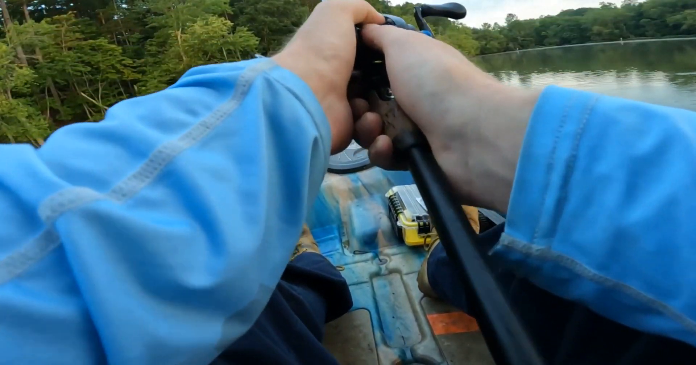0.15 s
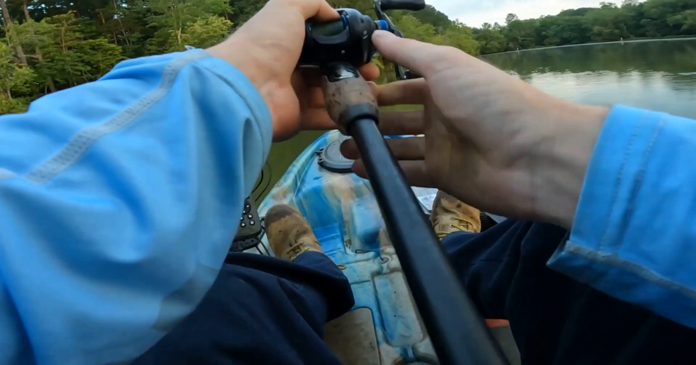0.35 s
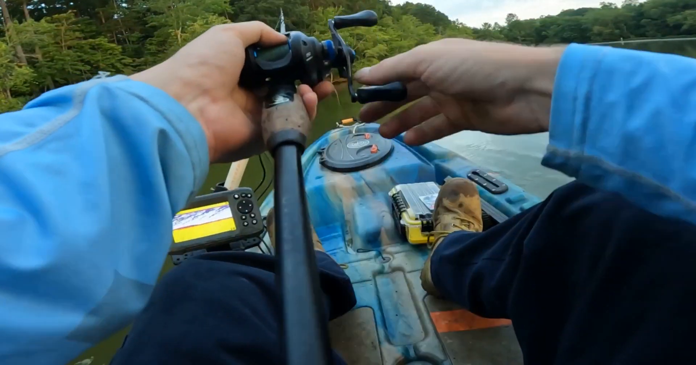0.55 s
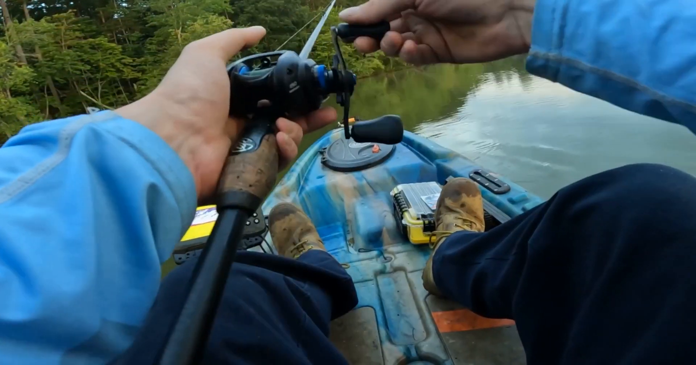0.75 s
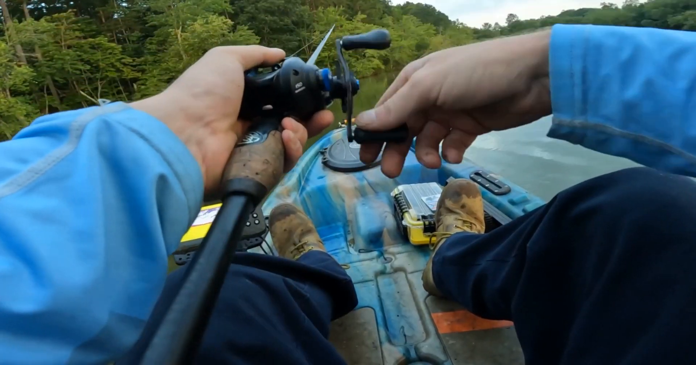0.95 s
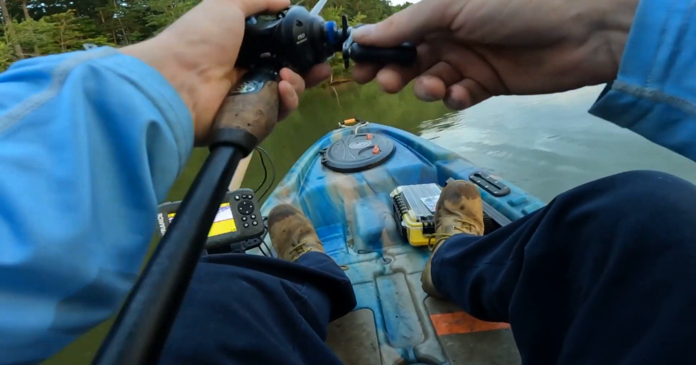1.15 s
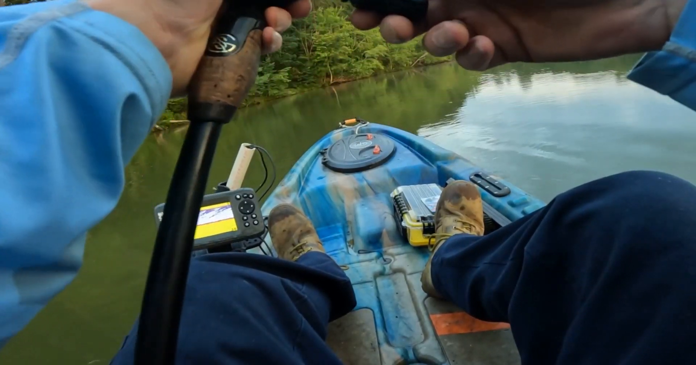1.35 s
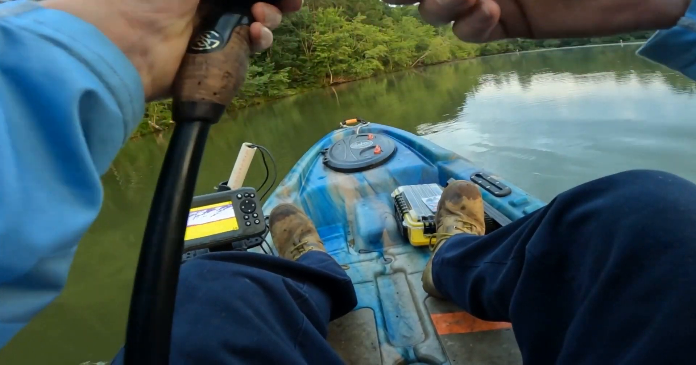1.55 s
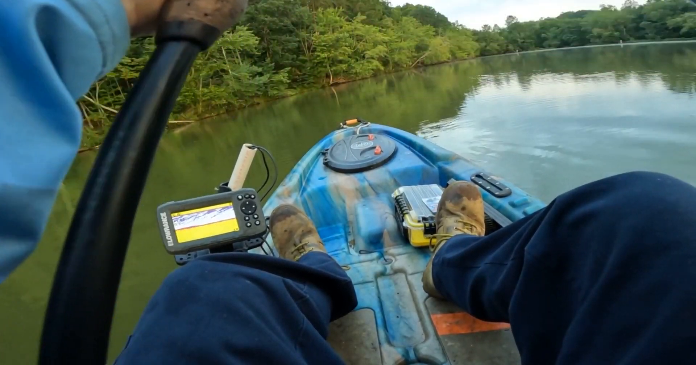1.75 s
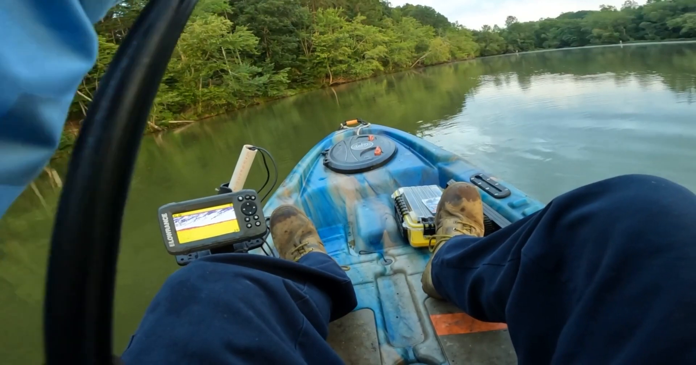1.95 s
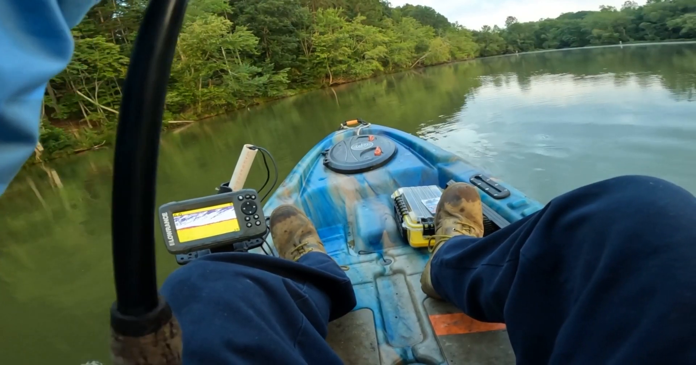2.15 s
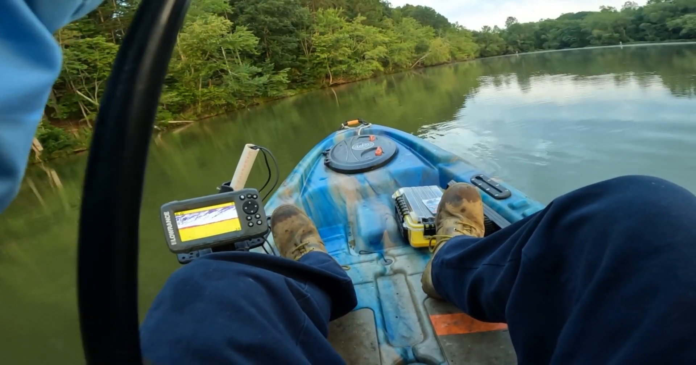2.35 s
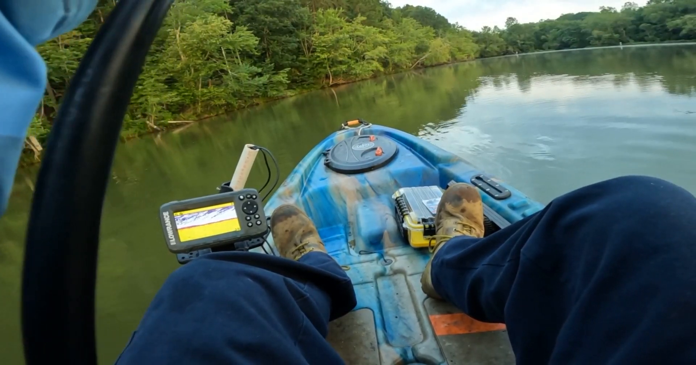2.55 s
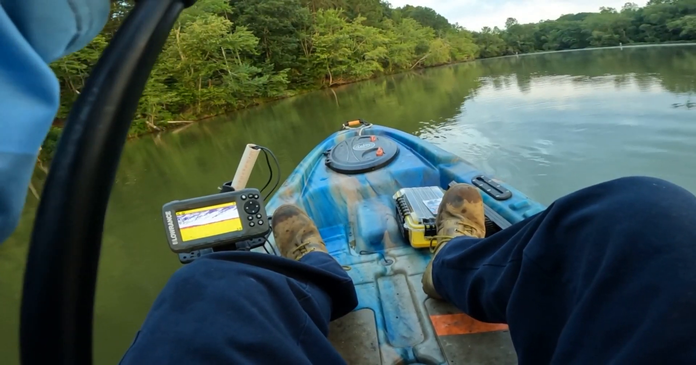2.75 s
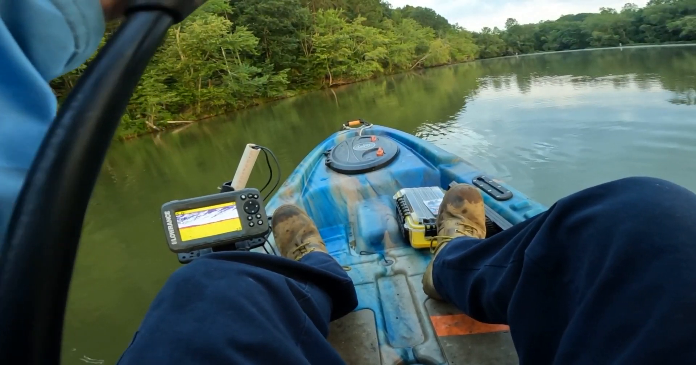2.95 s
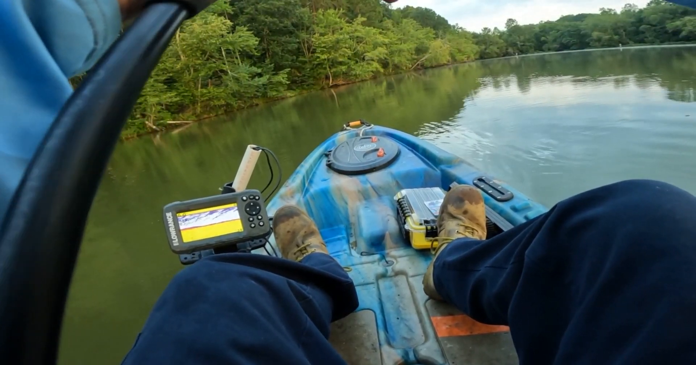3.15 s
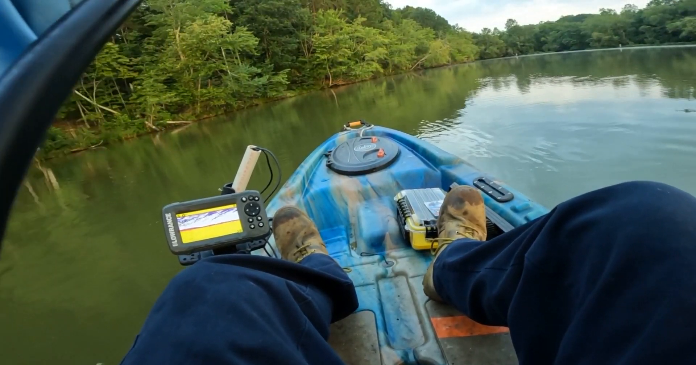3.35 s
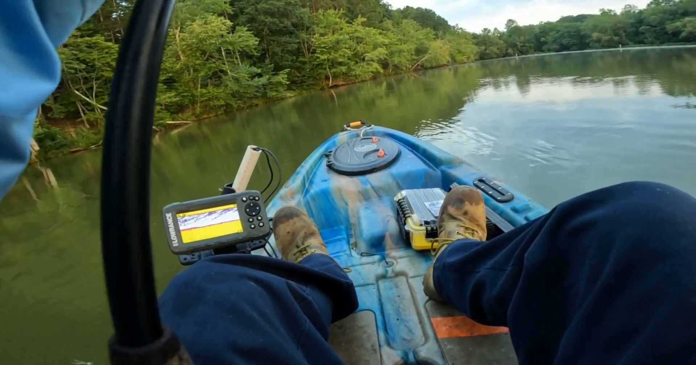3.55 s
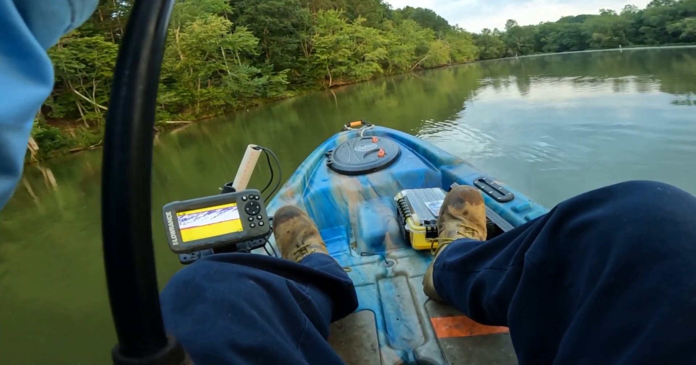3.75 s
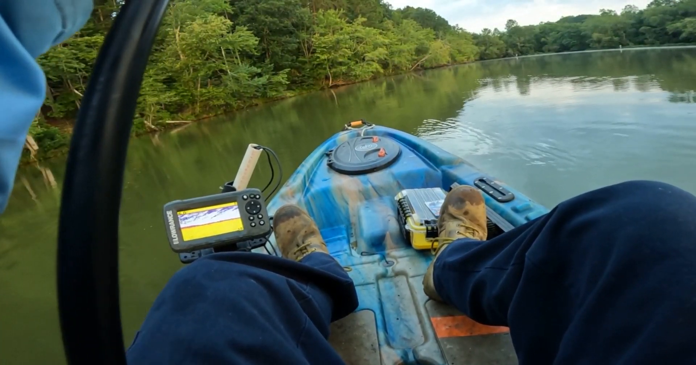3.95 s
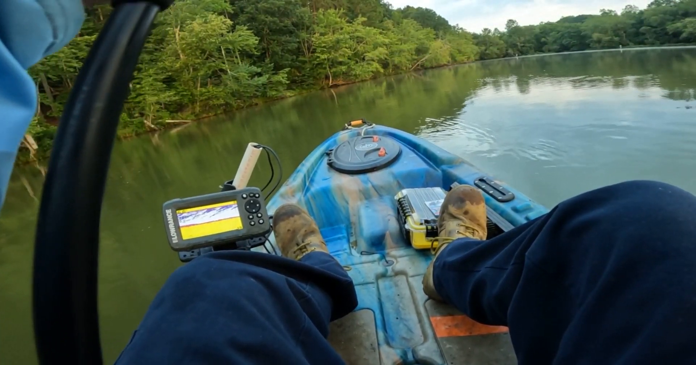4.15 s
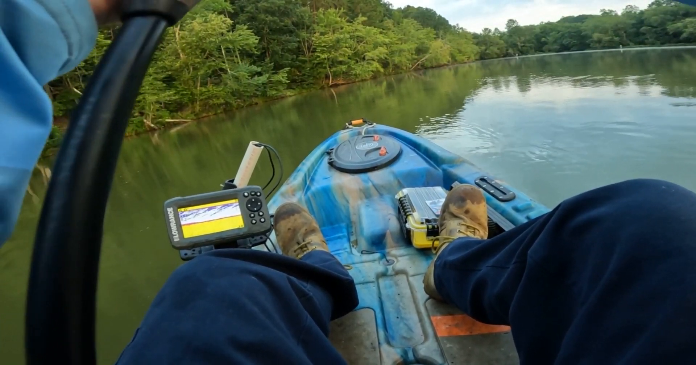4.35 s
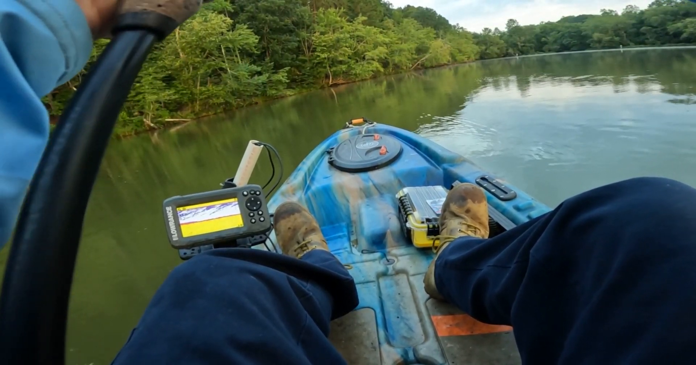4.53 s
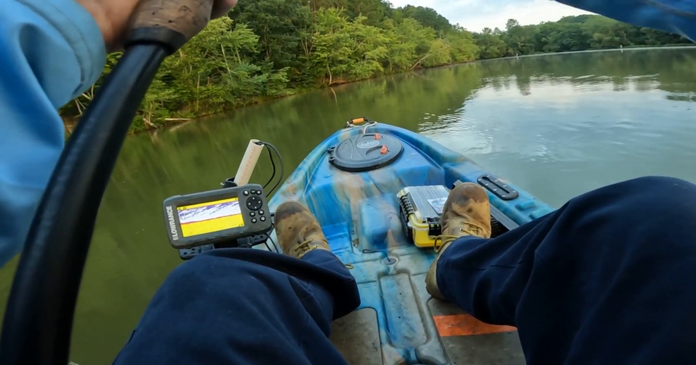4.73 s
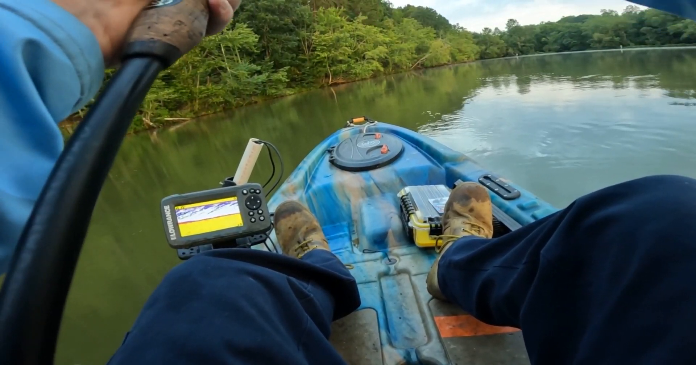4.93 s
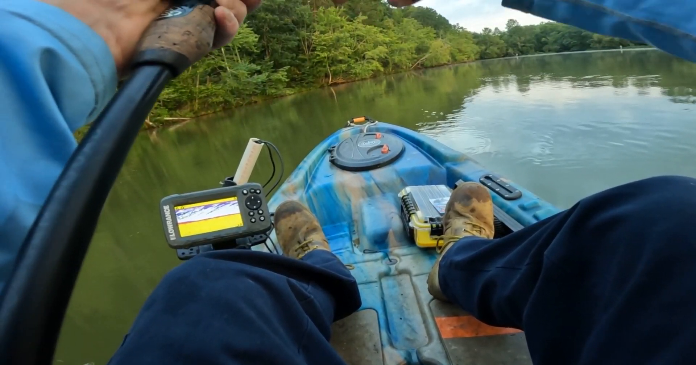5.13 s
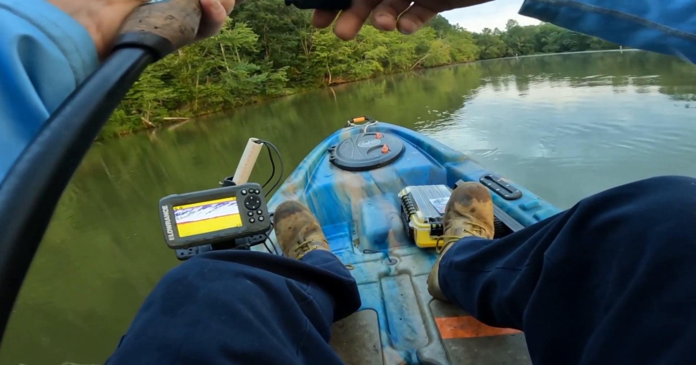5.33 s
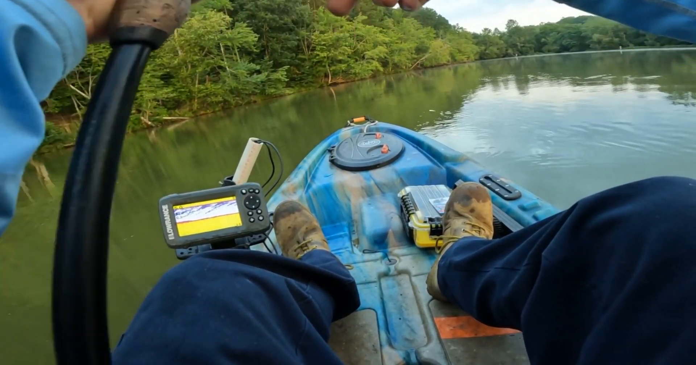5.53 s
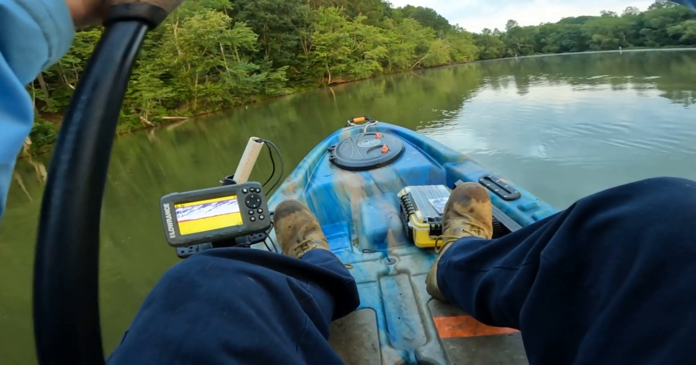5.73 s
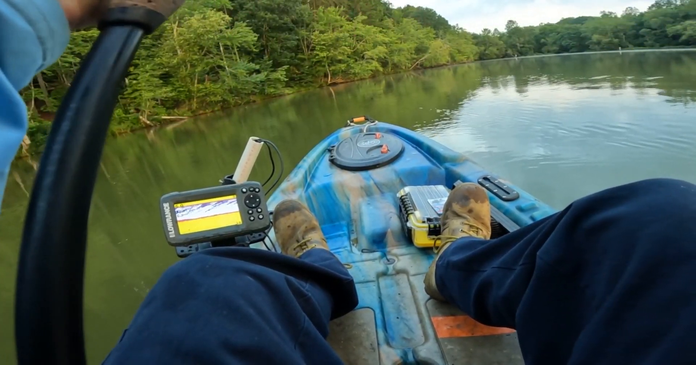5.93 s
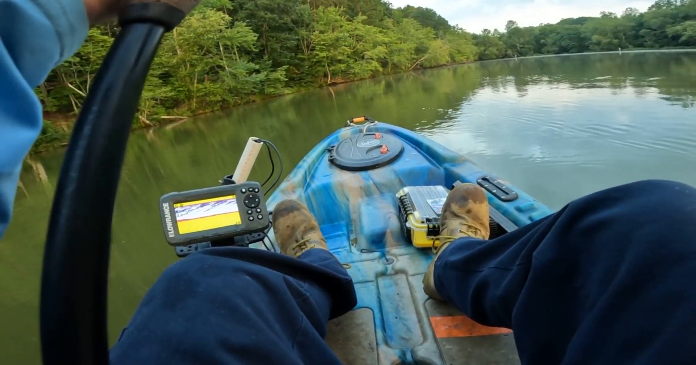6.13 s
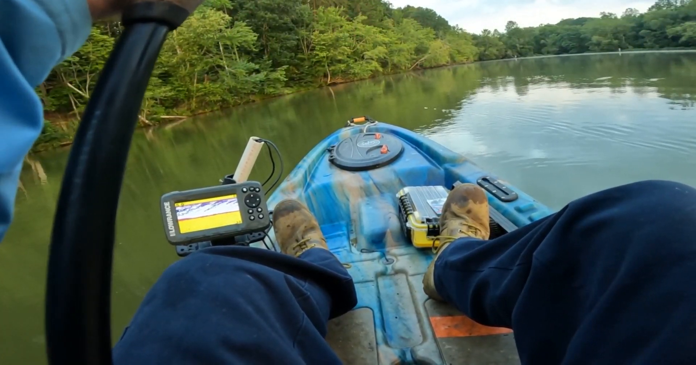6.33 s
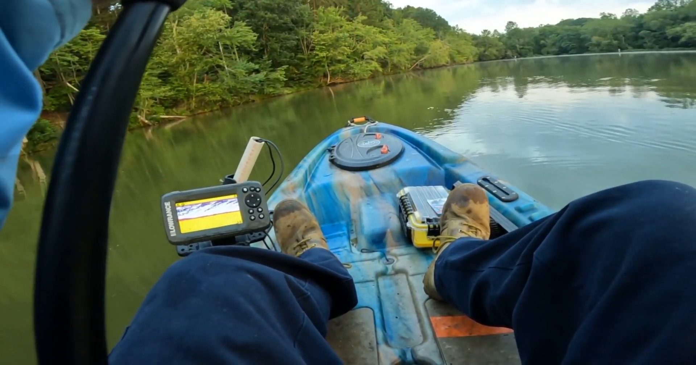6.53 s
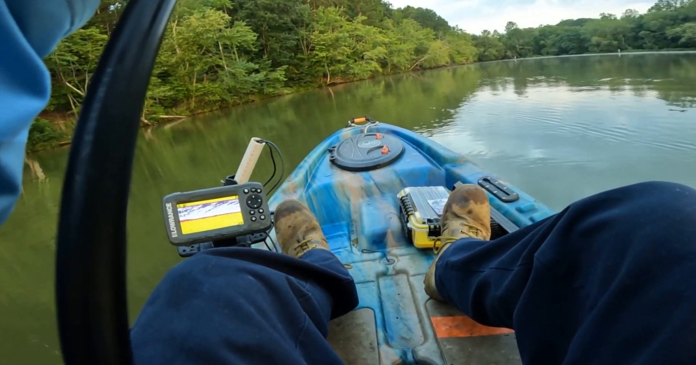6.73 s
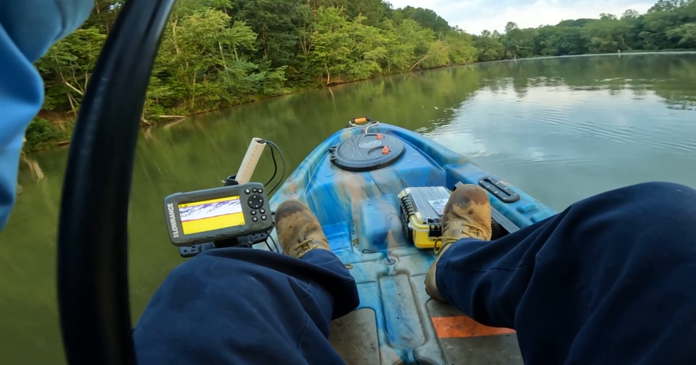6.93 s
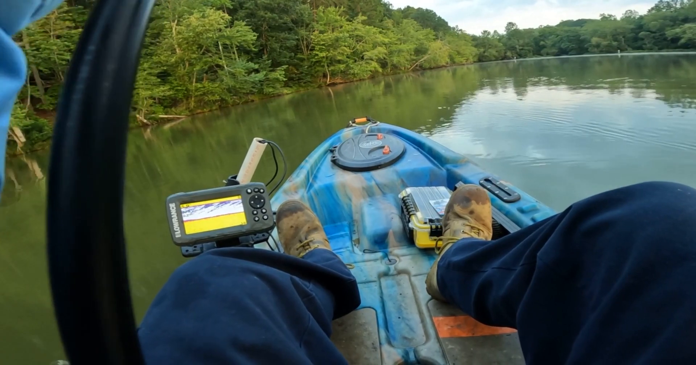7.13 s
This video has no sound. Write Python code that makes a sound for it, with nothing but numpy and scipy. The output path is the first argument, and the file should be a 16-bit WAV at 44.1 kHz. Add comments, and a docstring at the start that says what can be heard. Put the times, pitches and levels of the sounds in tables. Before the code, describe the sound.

A fishing reel's spool whines down to rest, its clutch snaps loudly into gear, then soft cranking whirrs over quiet lapping water and faint insects.

```python
"""A fishing reel at a cast: brake tones and turn-rate sidebands make the spool whine down to rest.
The clutch snaps into gear, stiff clicks over ringing metal, and cranking whirrs as noise-fed resonances.
The bearing sings in fits and soft noise swells brush the tackle.
Water laps and drips by the hull; a low rush of air, insects and small birds lie behind, all nearly mono."""
import sys
import numpy as np
from scipy import signal
from scipy.fft import rfft, irfft, next_fast_len
from scipy.io import wavfile
from scipy.ndimage import uniform_filter1d, minimum_filter1d

SR = 44100
rng = np.random.default_rng(int(sys.argv[2]) if len(sys.argv) > 2 else 0)


def to_wav(sig):
    """Store sig (one row per channel, or 1-D mono) as 16-bit WAV at the path in sys.argv[1].

    Samples outside -1..1 are clipped; the rate is SR.
    """
    pcm = np.clip(np.atleast_2d(sig), -1, 1) * 32767
    pcm = np.round(pcm).astype(np.int16)
    wavfile.write(sys.argv[1], SR, pcm.T)  # frames by channels


N = 321048  # length in samples


def amp(db):
    """Decibels to gain."""
    return 10 ** (np.asarray(db) / 20)


def unit(x):
    """Scale to rms 1."""
    return x / np.sqrt(np.mean(x ** 2) + 1e-20)


def along(points, hz):
    """Read a curve of (Hz, value) points on a log frequency axis."""
    f, v = np.transpose(points)
    return np.interp(np.log(hz + 1), np.log(f + 1), v)


def curves(rows):
    """One value per sample for each column after the time."""
    s, *cols = np.transpose(rows)
    return [np.interp(np.arange(N) / SR, s, c) for c in cols]


def wobble(rate):
    """A smooth random curve, rate knots a second."""
    knots = rng.standard_normal(int(N * rate / SR) + 4)
    smooth = signal.resample(knots, 8 * len(knots))
    return np.interp(np.arange(N) * 8 * rate / SR, np.arange(len(smooth)), smooth)


def filtered(x, response):
    """Shape the spectrum of x by a response of frequency."""
    m = next_fast_len(len(x) + 8192, real=True)
    spectrum = rfft(x, m) * response(np.fft.rfftfreq(m, 1 / SR))
    return irfft(spectrum, m)[:len(x)]


def noise(spectrum, size=N):
    """Coloured noise of rms 1."""
    return unit(filtered(rng.standard_normal(size), lambda hz: amp(along(spectrum, hz))))


def add(track, s, sound):
    """Mix a sound in at time s."""
    part = track[max(round(s * SR), 0):][:len(sound)]
    part += sound[:len(part)]


def arch(length):
    """A swell from 0 to 1 and back, length in s."""
    return np.sin(np.linspace(0, np.pi, int(length * SR)))


def swishes(rows, grain_db):
    """Soft grainy swells of noise from (start s, length s, dB, spectrum) rows."""
    out = np.zeros(N)
    for s, length, db, spectrum in rows:
        swell = arch(length)
        add(out, s, amp(db) * swell * noise(spectrum, size=SR)[:len(swell)])
    return out * unit(amp(grain_db * wobble(250)))


def resonance(drive, hz, width_hz):
    """One resonance, rms 1, whose centre may move from sample to sample."""
    carrier = np.exp(2j * np.pi * np.cumsum(hz) / SR)
    pole = np.exp(-np.pi * width_hz / SR)
    # shift the drive down to 0 Hz, smooth it there, and shift it back up
    return unit(np.real(carrier * signal.lfilter([1], [1, -pole], drive / carrier)))


def resonances(modes, drive, waver_db=4.2, waver_rate=18, wander=0.0066):
    """Narrow modes on one drive, rms 1 in all; each swells, fades and wanders in pitch on its own."""
    total = np.zeros(N)
    for hz, width, db in modes:
        level = amp(db + waver_db * wobble(waver_rate))
        moving_hz = hz * (1 + wander * wobble(waver_rate))
        total += level * resonance(drive, moving_hz, width)
    return unit(total)


# Strength of the low rush of air. Each row: time in seconds, level in dB before AIR_DB.
AIR = [(0, -47.5), (0.62, -45), (0.9, -53), (1.55, -47), (2.05, -53.5), (2.85, -50), (3.3, -45),
       (3.65, -54), (4.05, -55.5), (4.5, -47), (4.75, -53), (5.25, -46.5), (5.55, -48), (5.85, -42.5),
       (6.1, -47.5), (6.8, -47), (7.08, -36), (7.28, -43.5)]
# Colour of the rush. Each row: frequency in Hz, relative density in dB per Hz.
RUSH = [(60, -45), (120, -21.5), (170, -11.5), (265, 2.5), (315, 2), (450, -16.5), (700, -27.5),
        (1200, -65)]
# Colour of leaves and ripples. Each row: frequency in Hz, relative density in dB per Hz.
SHORE = [(15, -31), (60, -8), (150, 3), (400, 8), (700, -0.5), (1000, -3), (2000, -4.5), (3800, -10),
         (6200, -12.5), (7500, -25.5), (11000, -32), (14000, -43), (16000, -68.5)]
# Colour of the insect chorus. Each row: frequency in Hz, relative density in dB per Hz.
INSECTS = [(3500, -39.5), (4500, -8.5), (5150, -2), (5700, -13.5), (6800, -23.5), (9000, -63)]
# The shore bed. Each row: time in seconds, leaves and ripples in dB, insects in dB.
SHORE_LEVELS = [(0, -48.5, -57), (.6, -51.5, -65), (1.3, -59, -67.5), (2, -56.5, -63.5),
                (5.5, -55.5, -63.5), (6.6, -54, -58.5), (7.28, -54.5, -61)]
AIR_DB = -1  # gain of the whole rush


def lake():
    """A low rush of air, the hiss of leaves and ripples, and insects: three wavering noise bands."""
    air_db, = curves(AIR)
    shore_db, insect_db = curves(SHORE_LEVELS)
    air = amp(AIR_DB + air_db + 1.2 * wobble(9)) * noise(RUSH)
    shore = amp(shore_db + 0.91 * wobble(30)) * noise(SHORE)
    insects = amp(insect_db + 0.63 * wobble(40)) * noise(INSECTS)
    return air + shore + insects


# Chirps. Each row: start in seconds, length in seconds, start pitch in Hz, end pitch in Hz,
# peak level in dB before the flutter.
BIRDS = [(1.95, .045, 6400, 5240, -54), (3.492, 0.1, 3450, 2630, -53.5), (5.423, 0.065, 6240, 5110, -50),
         (5.836, 0.057, 3150, 2680, -57), (6.775, 0.1, 5600, 6380, -63), (6.924, 0.098, 8070, 6900, -64),
         (7.057, 0.099, 5670, 6300, -61)]


def birds(flutter_db=3):
    """Thin far chirps: each glides quickly, then settles; distance makes them flutter."""
    out = np.zeros(N)
    for s, length, from_hz, to_hz, db in BIRDS:
        u = np.linspace(0, 1, int(length * SR))
        hz = to_hz + (from_hz - to_hz) * (1 - u) ** 1.8
        add(out, s, amp(db) * np.sin(np.pi * u) ** 2 * np.sin(2 * np.pi * np.cumsum(hz) / SR))
    return out * amp(flutter_db * wobble(90))


# Wavelets at the hull. Each row: start in seconds, length in seconds, wash level in dB at the crest.
LAPS = [(2.188, 0.27, -57), (3.629, 0.2, -56.5), (5.66, 0.24, -57.5)]
# Colour of the wash. Each row: frequency in Hz, relative density in dB per Hz.
WASH = [(200, -33), (600, -12), (1100, -2), (2600, 2), (5000, -18), (14000, -58)]


def laps():
    """Water washes along the hull in grainy swells of noise."""
    return swishes([(s, length, db, WASH) for s, length, db in LAPS], grain_db=5.0)


# small bubbles in a lap: rate, typical level re the wash, typical pitch
BUBBLES_PER_S, BUBBLE_DB, BUBBLE_HZ = 50, 4.5, 1296


def small_bubbles(pitch_spread=0.312, spread_db=2):
    """Each lap sheds bubbles at random, most near its crest: (s, dB, pitch Hz)."""
    bubbles = []
    for s, length, db in LAPS:
        for _ in range(round(BUBBLES_PER_S * length)):
            start = s + length * rng.beta(2, 2)
            level = db + BUBBLE_DB + spread_db * rng.standard_normal()
            hz = BUBBLE_HZ * np.exp(pitch_spread * rng.standard_normal())
            bubbles.append((start, level, hz))
    return bubbles


# The clearest drips. Each row: start in seconds, level in dB, starting pitch in Hz.
DRIPS = [(2.2, -48.5, 1090), (2.241, -46.5, 1070), (2.303, -45, 1055), (2.324, -45, 1230),
         (3.696, -42.5, 990), (3.791, -45, 2100), (3.823, -35.5, 2170), (3.851, -47, 1870),
         (5.682, -40, 2300), (5.687, -45, 1530), (5.7, -47, 1860), (5.72, -44, 973), (5.738, -45, 1370),
         (5.759, -48, 1500), (5.881, -49, 1110)]


def drips(rise=0.09, life_cycles=40, splash_db=-11, onset_s=0.0012):
    """A bubble rings for some cycles and rises in pitch, under a short splash."""
    t = np.arange(SR // 8) / SR
    out = np.zeros(N)
    for s, db, hz in DRIPS + small_bubbles():
        age = t * hz / life_cycles
        bubble = np.sin(2 * np.pi * hz * t * (1 + rise * age))
        spray = amp(splash_db) * noise([(300, -20), (1200, 4), (3000, 1), (14000, -39)], size=len(t))
        shape = amp(-60 * age) * (1 - np.exp(-t / onset_s))
        add(out, s, amp(db) * shape / shape.max() * (bubble + spray))
    return out


# Sleeve and hand on the tackle, from soft rumble to swish. Each row: start in seconds,
# length in seconds, level in dB at the crest, centre in Hz.
BRUSHES = [(0.447, 0.059, -53, 2500), (0.719, 0.44, -57, 1092), (0.769, 0.26, -60, 3400),
           (1.957, 0.06, -61, 2100), (6.734, .19, -57, 2720), (7, 0.054, -67, 10200)]


def brushes():
    """Cloth and skin rub, each time in a broad band of its own."""
    band = lambda hz: [(hz / 6, -40), (hz / 2, -6), (hz, 0), (hz * 2, -12), (hz * 12, -80)]
    return swishes([(s, length, db, band(hz)) for s, length, db, hz in BRUSHES], grain_db=3.5)


# One low mode, then a high cluster. Each row: pitch in Hz, width in Hz, relative level in dB;
# the low mode keeps this trim, the cluster as a whole is levelled to rms 1.
BEARING = [(4124, 43, -0.5), (5650, 92, 2.5), (6640, 60, -3.5)]
# Fits of singing. Each row: start in seconds, length in seconds, low mode in dB before its trim,
# high cluster in dB.
SINGS = [(2.877, 0.32, -61.5, -63.5), (4.133, 0.53, -53, -57.5), (4.678, 0.296, -55, -74),
         (5.02, 0.1, -55.5, -71)]
SING_EDGE_S = 0.025  # a fit sets in and dies this fast


def bearing():
    """The spool bearing sings in fits: rubbing noise rings narrow modes on steady, breathy pitches."""
    low_gain, high_gain = np.zeros((2, N))
    for s, length, low_db, high_db in SINGS:
        t = np.arange(int(length * SR)) / SR
        fit = np.clip(np.minimum(t, length - t) / SING_EDGE_S, 0, 1)
        add(low_gain, s, amp(low_db) * fit)
        add(high_gain, s, amp(high_db) * fit)
    rub = noise(GEARS)
    low, *high = [amp(db) * resonance(rub, np.full(N, hz), width) for hz, width, db in BEARING]
    return low_gain * low + high_gain * unit(sum(high))


# Cranking, taking up slack and then winding in. Each row: start in seconds, length in seconds,
# speeding up in seconds, slowing down in seconds, speed aimed for from 0 to 1.
CRANKS = [(0.699, 0.48, 0.12, 0.23, 0.61), (1.491, 0.14, 0.087, 0.073, 0.47),
          (1.62, 0.19, 0.088, 0.088, 0.45), (2.204, 1.175, 0.41, 0.11, 0.86), (3.584, 1.934, 0.61, 0.56, 1)]
# The hand hesitates. Each entry: start in seconds.
HESITATIONS = [2.715, 4.07, 4.95]
HESITATION_S, HESITATION_SHARE = 0.079, 0.24  # for this long, losing up to this share of its speed


def crank_speed():
    """The handle speeds up evenly, holds if time allows, and slows to rest; at times the hand hesitates."""
    t = np.arange(N) / SR
    lost = np.zeros(N)
    for s in HESITATIONS:
        add(lost, s, HESITATION_SHARE * arch(HESITATION_S))
    speed = np.zeros(N)
    for s, length, rise_s, fall_s, top in CRANKS:
        speed += top * np.clip(np.minimum((t - s) / rise_s, (s + length - t) / fall_s), 0, 1)
    return speed * (1 - lost)


# Colour of rubbing teeth. Each row: frequency in Hz, relative density in dB per Hz.
GEARS = [(250, -31), (500, -7), (1050, -5.5), (1500, -5.5), (2200, -1.5), (3000, -9), (4200, -6.5),
         (6500, -16.5), (9000, -30.5), (13800, -32), (15300, -61.5)]
# Resonances of the gear case. Each row: pitch in Hz, width in Hz, relative level in dB.
CASE = [(1071, 25, -7.5), (1825, 43, 4.5), (2070, 100, 1.5), (2334, 70, 3.5)]
# Tugs on the line. Each row: start in seconds, length in seconds, crest of the rasp's case tone in dB,
# crest of the moan in dB.
TUGS = [(2.64, 0.11, -51, -45.5), (2.755, 0.45, -57.5, -57), (4.16, 0.24, -58, -56.5),
        (4.914, 0.038, -57, -77), (5.03, 0.11, -58, -75), (5.287, 0.098, -60, -77)]
GEAR_DB = -48.5  # at full speed, before the balance of rub and case
HAND_WAVER_DB, HAND_WAVER_RATE = 1, 12  # unevenness of the hand, and its random knots a second


def gears(grain_db=1.37, broad_db=-1.5, case_db=-5, strain_db=-8):
    """Teeth rub in tiny grains that sound the gear case; tugs load the gears, which rasp and moan."""
    rasp_gain, moan_gain = np.zeros((2, N))
    for s, length, rasp_db, moan_db in TUGS:
        add(rasp_gain, s, amp(rasp_db) * arch(length))
        add(moan_gain, s, amp(moan_db) * arch(length))
    rub = unit(noise(GEARS) * amp(grain_db * wobble(400)))
    case = resonances(CASE, rub, wander=0.015)
    effort = crank_speed() * amp(GEAR_DB + HAND_WAVER_DB * wobble(HAND_WAVER_RATE))
    whirr = amp(broad_db) * rub + amp(case_db) * case
    rasp = case + amp(strain_db) * rub
    moan = resonances(CASE[:1], rub)  # the lowest mode alone
    return effort * whirr + rasp_gain * rasp + moan_gain * moan


# Modes of the rod's grip. Each row: pitch in Hz, starting level in dB.
GRIP = [(210, -35), (395, -38)]
THUD_S, THUD_T60 = .699, 0.082  # start and 60 dB decay, s


def thud():
    """The rod's grip takes the clutch's slam as a short low thud of decaying sines."""
    t = np.arange(SR // 8) / SR
    out = np.zeros(N)
    tones = sum(amp(db) * np.sin(2 * np.pi * hz * t) for hz, db in GRIP)
    add(out, THUD_S, amp(-60 * t / THUD_T60) * tones)
    return out


# The clutch trips lightly, then slams home and rebounds. Each row: start in seconds, level in dB,
# snap pitch in Hz, swell time in seconds, crack in dB re that level, low cut in Hz.
CLUTCH = [(.6809, -9, 2500, 0.00034, -16, 1600), (.6826, -10.5, 3770, 0.00023, -9.5, 1600),
          (.6852, -12, 3540, 0.00014, -7, 1500), (.6984, -3, 2160, 0.00038, -7.5, 399),
          (.7009, -0.5, 3410, 0.0005, 0, 199), (.7050, -7, 2520, 0.00036, -8, 300)]
# Light ticks, of the tackle and of water at the hull. Each row: start in seconds, level in dB, snap pitch in
# Hz, # crack in dB re that level.
TICKS = [(0.654, -28.5, 2160, -12), (.6907, -19, 3000, -5), (0.6961, -18.5, 2400, -14),
         (2.275, -34.5, 1850, -18), (2.294, -37, 1950, -19), (2.338, -39, 2200, -16),
         (3.724, -39, 4680, -19), (5.7362, -44, 3980, -1), (5.8065, -33.5, 3400, -19),
         (5.831, -41, 4400, -16), (6.491, -40, 2870, -2)]
TICK_SWELL_S, TICK_LOW_SHARE = 0.00015, 0.47  # swell time of a tick; its low cut over its pitch


def contacts():
    """Every clutch contact and light tick, as rows with the columns of CLUTCH."""
    ticks = [(s, db, hz, TICK_SWELL_S, crack_db, TICK_LOW_SHARE * hz) for s, db, hz, crack_db in TICKS]
    return CLUTCH + ticks


# The reel's frame rings. Each row: pitch in Hz, relative level in dB, 60 dB decay in seconds.
FRAME = [(885, -3, .05), (1056, -3, .055), (1470, -4, .05), (1800, 1, .045), (1938, -1, .03),
         (2240, 1, .03), (2583, 1, .03), (2748, 1, .028), (3236, -1, .025), (4280, -3, .022),
         (5340, -8, .03), (6750, -8, .03)]


def clutch(ring_db=-25, crack_t60=0.0087, rattle_db=-32, rattle_t60=0.082):
    """Each contact is a short stiff snap with a crack; the frame rings and loose parts rattle after it."""
    t = np.arange(SR // 8) / SR
    out = np.zeros(N)
    grit = [(40, -29.5), (900, -2.5), (2200, 5.0), (4200, -1.0), (5500, -2.0), (7600, -8.5),
            (11200, -12.0), (15000, -27.5)]
    for s, db, hz, swell_s, crack_db, low_hz in contacts():
        snap = t / swell_s * np.exp(1 - t / swell_s) * np.sin(2 * np.pi * hz * t)
        ring = np.zeros(len(t))
        for f, level, t60 in FRAME:
            ring += amp(level - 60 * t / t60) * np.sin(2 * np.pi * (f * t + rng.random()))
        burst = amp(crack_db - 60 * t / crack_t60) + amp(rattle_db - 60 * t / rattle_t60)
        crack = burst * noise(grit, size=len(t))
        hit = snap + (amp(ring_db) * ring + crack) * (1 - np.exp(-t / 0.00012))
        # the smaller the part that is struck, the less bass it radiates
        low_cut = signal.butter(4, low_hz, "high", fs=SR, output="sos")
        add(out, s, amp(db) * signal.sosfilt(low_cut, hit))
    return out


# The spool runs down. Each row: time in seconds, speed in turns a second.
SPOOL = [(0, 395), (.1, 349), (.18, 291), (.24, 222.5), (.27, 173), (.3, 96), (.322, 24), (.46, 1)]
# Brake tones before fading and the plate's boost. Each row: multiple of the pulse rate,
# lower sideband in dB, centre in dB, upper sideband in dB, power of speed by which they fade.
BRAKE = [(1, -72, -54, -65, 1.4), (2, -52.5, -41, -38, 1.4), (3, -48.5, -48.5, -54.5, .2),
         (4, -50.5, -50.5, -52.5, 0.55), (6, -71, -62, -79, 1.1)]
# Colour of the running line. Each row: frequency in Hz, relative density in dB per Hz.
LINE_HISS = [(300, -15.5), (700, -3.5), (1300, -9), (1850, 4), (2300, -6), (2800, -8), (4200, -9.5),
             (5000, -14), (7500, -16.5), (8700, -35), (9700, -15.5), (11200, -17), (14500, -26),
             (16000, -51)]
BRAKE_HZ = 974.5  # pulse rate
WHINE_FULL_SPEED, WHINE_STOP_SPEED = 340, 150  # turns a second: below these it weakens; the brake lets go
# the side plate swells any brake tone that glides through its resonance
PLATE_HZ, PLATE_WIDTH_HZ, PLATE_DB = 1686, 65, 13.5
# hiss of slack line; change when taut at top speed; turns a second below which it fades
HISS_DB, TAUT_DB, HISS_FULL_SPEED = -40.5, -4.5, 112


def spool(flutter=0.12, line_throb=0.27):
    """The brake pulses at a fixed rate; the spool's turning adds sidebands that close in as it slows."""
    speed, = curves(SPOOL)
    turn = 2 * np.pi * np.cumsum(speed) / SR
    pulse = 2 * np.pi * BRAKE_HZ * np.arange(N) / SR
    let_go = np.clip(speed / WHINE_STOP_SPEED, 0, 1) ** 2
    whine = np.zeros(N)
    for multiple, *levels, power in BRAKE:
        fade = np.clip(speed / WHINE_FULL_SPEED, 0, 1) ** power * let_go
        for side, db in zip((-1, 0, 1), levels):
            phase = multiple * pulse + side * turn + rng.uniform(0, 2 * np.pi)
            hz = multiple * BRAKE_HZ + side * speed
            plate_db = PLATE_DB / (1 + ((hz - PLATE_HZ) / PLATE_WIDTH_HZ) ** 2)
            level = fade * amp(db + plate_db) * np.sqrt(2)  # the table gives rms levels
            whine += level * (1 + flutter * wobble(59)) * np.sin(phase)
    # the line brushes the guide once every turn, and louder as it goes slack
    hiss = unit(noise(LINE_HISS) * (1 + line_throb * np.sin(turn)))
    taut = (speed / speed.max()) ** 4
    hiss_gain = amp(HISS_DB + TAUT_DB * taut) * np.clip(speed / HISS_FULL_SPEED, 0, 1)
    return whine + hiss_gain * hiss


# Stereo width. Each row: frequency in Hz, side level in dB re the middle.
WIDTH = [(100, -29), (250, -55.5), (3000, -45.5), (5000, -35), (9000, -13.5)]


def scene():
    """The reel is dead ahead; left and right differ only slightly, most in the treble."""
    shore = lake() + birds()
    water = laps() + drips()
    reel = brushes() + bearing() + gears() + thud() + clutch() + spool()
    mid = shore + water + reel
    side = filtered(mid, lambda hz: 1j * amp(along(WIDTH, hz)))  # a quarter cycle out of step
    return np.array([mid + side, mid - side])


TOP_HZ = 15100  # band limit


def record(dry, ceiling=1.0, hold_s=0.0019):
    """A steep low-pass sets the band limit, then a fast limiter holds peaks under full scale."""
    low_pass = lambda hz: 1 / np.sqrt(1 + (hz / TOP_HZ) ** 160)
    banded = np.array([filtered(channel, low_pass) for channel in dry])
    size = round(hold_s * SR)
    needed = 1 / np.maximum(np.abs(banded).max(axis=0) / ceiling, 1)
    # hold the lowest gain around each peak, then smooth its edges
    return banded * uniform_filter1d(minimum_filter1d(needed, 2 * size), size)


dry = scene()
out = record(dry)
to_wav(out)
```